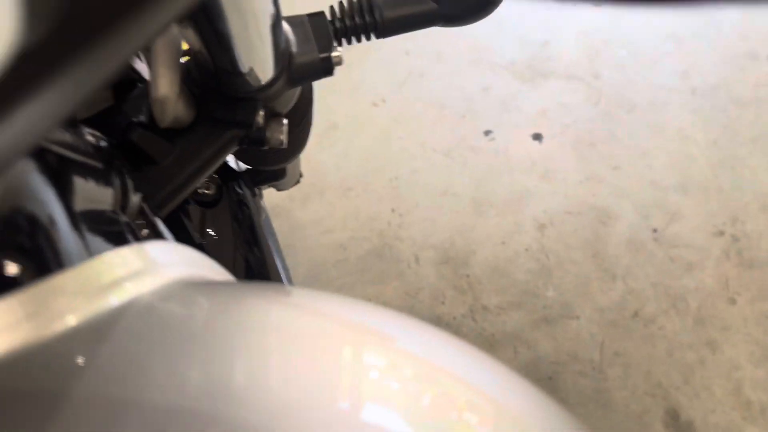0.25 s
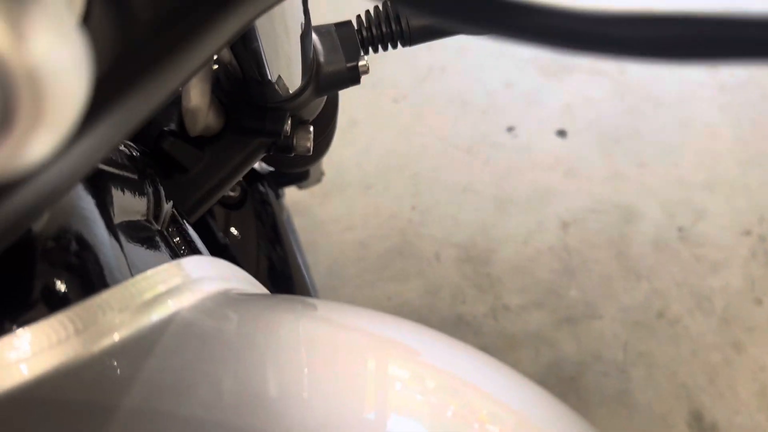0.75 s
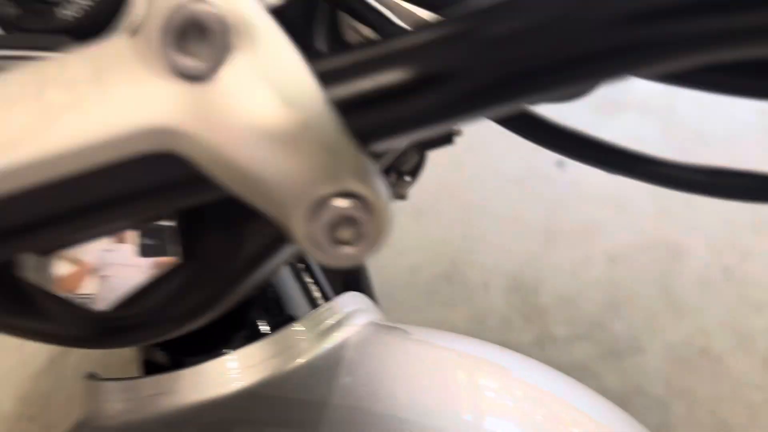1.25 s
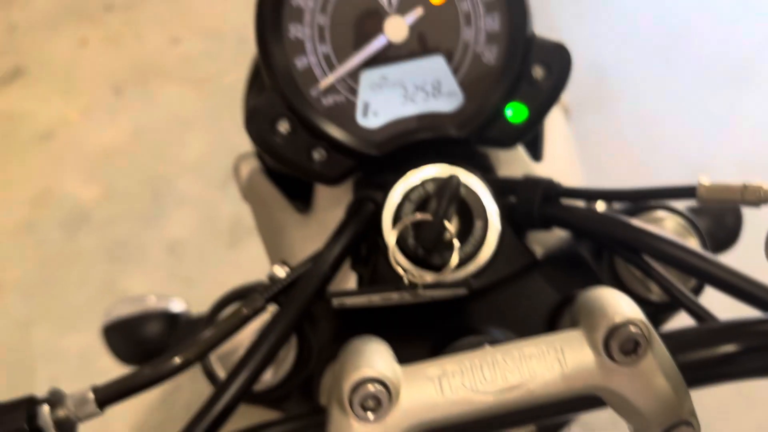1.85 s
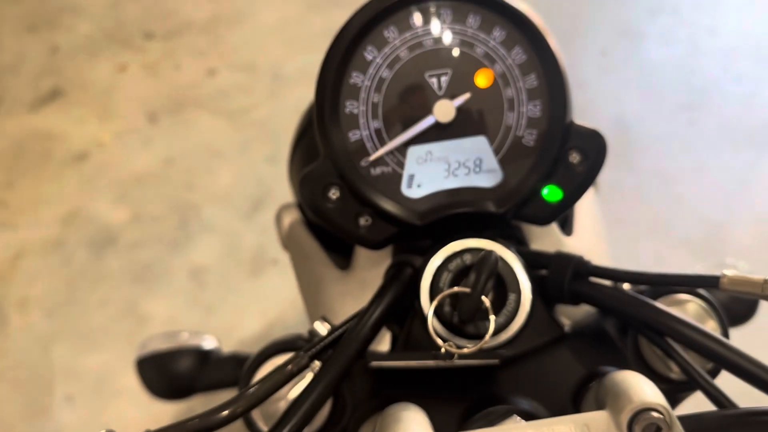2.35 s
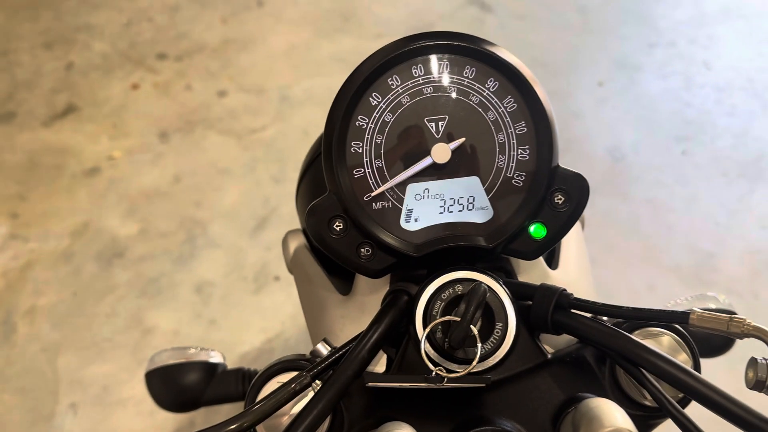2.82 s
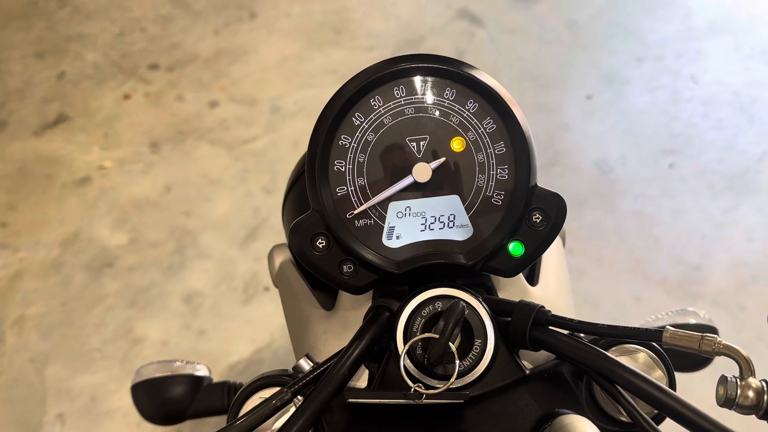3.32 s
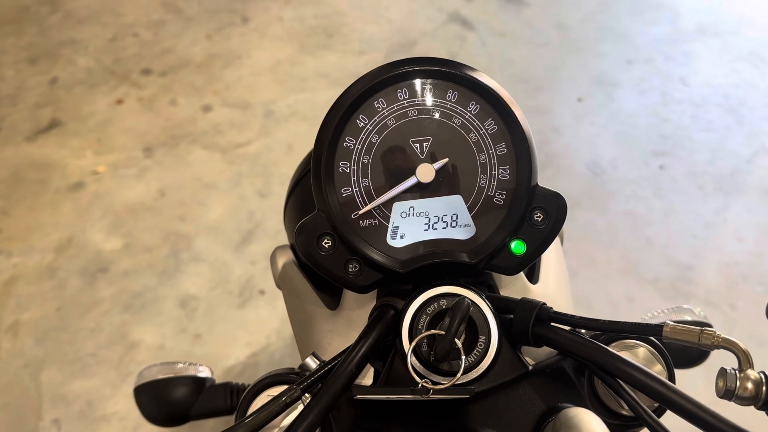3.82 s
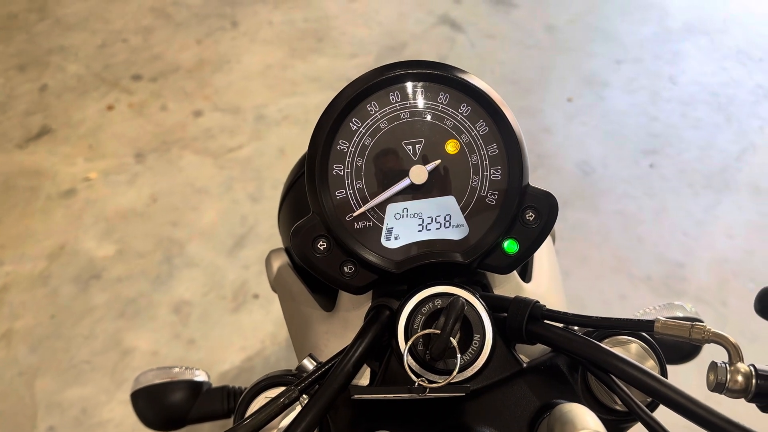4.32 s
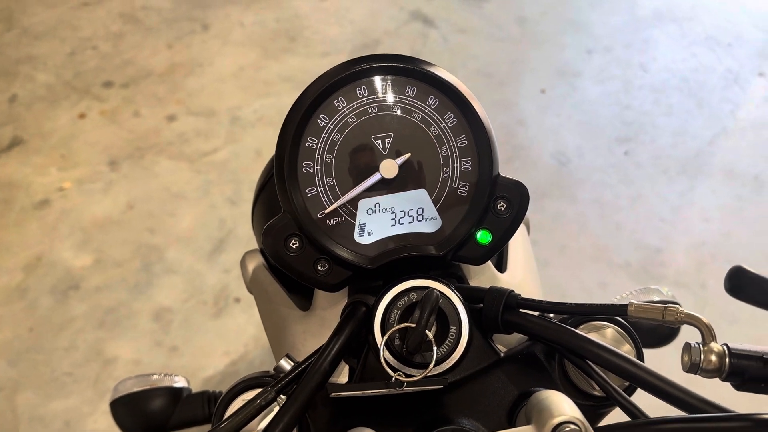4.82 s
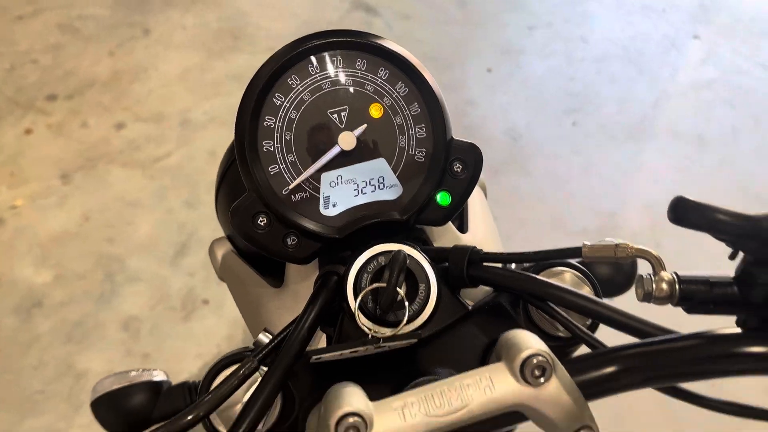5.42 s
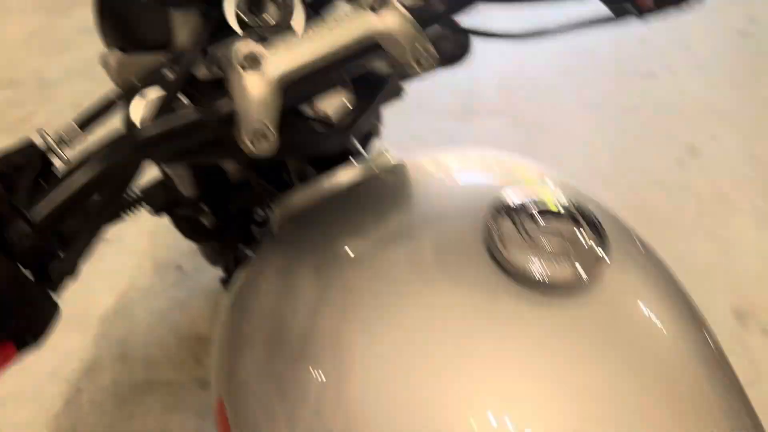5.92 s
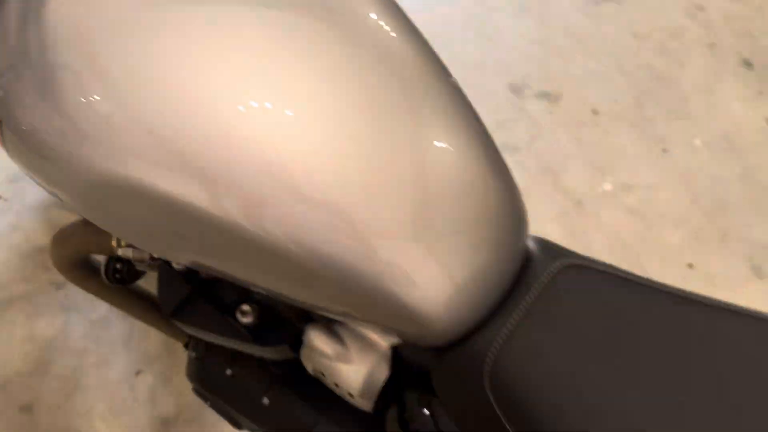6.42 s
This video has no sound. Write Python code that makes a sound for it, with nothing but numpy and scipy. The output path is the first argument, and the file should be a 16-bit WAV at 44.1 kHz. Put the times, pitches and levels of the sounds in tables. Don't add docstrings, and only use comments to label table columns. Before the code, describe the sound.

Close handheld stereo pickup of a motorcycle starting indoors. A harsh, jerky starter grind whines downward in short strokes with metallic knocks, then lets go as the two cylinders fire raggedly. The engine quickly finds a lumpy, bassy idle, its muffled exhaust pulsing unevenly beneath dense mechanical ticking and gear whine. The idle wanders slightly without revving; near the end the treble clatter comes a little closer. Hard surfaces add a diffuse tail.

```python
import sys
import numpy as np
from scipy import signal
from scipy.fft import rfft, irfft, next_fast_len
from scipy.io import wavfile
from scipy.ndimage import uniform_filter1d

SR = 44100
rng = np.random.default_rng(int(sys.argv[2]) if len(sys.argv) > 2 else 0)


def gain_from_db(level_db):
    decades = np.asarray(level_db, float) / 20
    return 10 ** decades


def master(y):
    cut = np.clip(np.atleast_2d(y).T, -1, 1)
    pcm = np.round(cut * 32767)
    wavfile.write(sys.argv[1], SR, pcm.astype(np.int16))


N = 293706

# (peak time [s], rise time [s], grind level [dB], whine level [dB], tooth whine frequency [Hz])
STROKES = [
    (.05, 0.22, -11, -48, 1180),
    (0.151, 0.018, -17, -14, 1220),
    (.184, 0.016, -13.5, -18, 1280),
    (0.322, 0.042, -11, -38, 1120),
    (0.439, 0.015, -12, -21, 1140),
    (0.647, .035, -15.5, -25, 1080),
]


def evened(x):
    return x / np.sqrt(np.mean(x ** 2) + 1e-20)


def read(points, hz):
    f, value = np.transpose(points)
    return np.interp(np.log(hz + 1), np.log(f + 1), value)


def played(rows):
    s, *columns = np.transpose(rows)
    t = np.arange(N) / SR
    lasting = 1. * (t >= s[0] - .01) * (t <= s[-1])
    return [np.interp(t, s, c) for c in columns] + [uniform_filter1d(lasting, 800)]


def coloured(x, gain):
    size = next_fast_len(N + 4096)
    hz = np.fft.rfftfreq(size, 1 / SR)
    return irfft(rfft(x, size) * gain(hz), size)[..., :N]


def resonate(x, hz, width_hz):
    turn = np.exp(2j * np.pi * np.cumsum(hz * np.ones(N)) / SR)
    r = np.exp(-np.pi * width_hz / SR)
    return 2 * (turn * signal.lfilter([1 - r], [1, -r], x / turn + 1e-18)).real


def struck(hits, modes, rise_s=0.0019, rattle_s=0.):
    t, blows = np.arange(SR // 2) / SR, np.zeros(N)
    for s, db in hits:
        later = np.r_[0, rng.random(5)] * rattle_s
        bounce_db = db - 7 * (later > 0) - 300 * later
        np.add.at(blows, np.round((s + later) * SR).astype(int), gain_from_db(bounce_db))
    ring = sum(gain_from_db(db - 60 * t / t60) * np.sin(2 * np.pi * hz * t) for hz, db, t60 in modes)
    return signal.fftconvolve(blows, ring * (1 - np.exp(-t / rise_s)))[:N]


def room_hum():
    # (frequency [Hz], density [dB per Hz])
    hum_density = [(15, -75), (30, -62), (60, -56), (150, -60), (400, -66), (2000, -80), (15000, -95)]
    return coloured(rng.standard_normal(N), lambda hz: gain_from_db(read(hum_density, hz) + 34.5))


def showroom(x):
    # (frequency [Hz], level [dB])
    wet_level = [(40, -34), (150, -21), (300, -9), (600, -3), (1300, -2), (2500, -4), (5000, -5),
                 (7500, -15), (9000, -15), (15000, -8)]
    t = np.arange(SR // 2) / SR
    low, high = rng.standard_normal((2, 2, len(t)))
    tail = uniform_filter1d(low, 8) * gain_from_db(-60 * t / 0.99 + 6.0) + high * gain_from_db(-60 * t / 0.66)
    tail *= t > .004
    even = lambda hz: gain_from_db(read(wet_level, hz)) / np.sqrt(1 + 7.0 / (1 + (hz / 2500) ** 2))
    return coloured(signal.fftconvolve(x[None], tail / 30, axes=1)[:, :N], even)


def strokes(levels_db, quick_db, fall_db_per_s):
    rise_db, quick_s, let_go_s, let_go_db_per_s = 13, .01, .68, 100
    t = np.arange(SR) / SR
    s, rise_s = np.transpose(STROKES)[:2, :, None]
    after = np.maximum(t - s, 0)
    shape_db = -rise_db * np.maximum(s - t, 0) / rise_s - quick_db * (1 - np.exp(-after / quick_s))
    db = np.array(levels_db)[:, None] + shape_db - fall_db_per_s * after
    db = 10 * np.log10((gain_from_db(db) ** 2).sum(0) + 1e-30)
    db -= let_go_db_per_s * np.maximum(t - let_go_s, 0)
    return np.r_[db, np.full(N - SR, -200.)]


def starter_grind():
    # (frequency [Hz], density [dB per Hz])
    grind_density = [(150, -57), (250, -20), (385, -39), (450, -14), (507, -36), (583, -14), (913, -16),
                     (1120, -3.5), (2160, -12.5), (2620, -11.5), (3890, -22.5), (6100, -20.5), (7700, -11),
                     (8600, -14.5), (10000, -24.5), (15500, -40)]
    # (time [s], level [dB])
    hisses = [
        (0, -32),
        (.132, -21.5),
        (.27, -20.5),
        (.428, -32),
        (.615, -26),
    ]
    hiss_fall_db_per_s = 57
    t = np.arange(N) / SR
    grind_db = strokes(np.transpose(STROKES)[2], quick_db=7, fall_db_per_s=70)
    hiss = sum(gain_from_db(db - hiss_fall_db_per_s * abs(t - s)) * np.clip((t - s) / .006, 0, 1)
               for s, db in hisses)
    grit = rng.standard_normal(N) * gain_from_db(1.6 * evened(uniform_filter1d(rng.standard_normal(N), 90)))
    band = lambda f: 1 / (1 + (330 / (f + 1)) ** 6) / (1 + (f / 11500) ** 6)
    grind = evened(coloured(grit, lambda f: gain_from_db(read(grind_density, f)) * band(f)))
    treble = coloured(grind, lambda f: 1 / (1 + (3800 / (f + 1)) ** 8))
    spin_up = np.interp(t, [.1, .13], [.4, 1])
    return gain_from_db(grind_db - 3.0) * spin_up * (grind - treble) + hiss * treble


def starter_whine(teeth):
    s, _, _, whine_db, hz = np.transpose(STROKES)
    whine_db = strokes(whine_db, quick_db=6, fall_db_per_s=230)
    hz = np.interp(np.arange(N) / SR, s, hz)
    whine = evened(resonate(teeth, hz, 50) + gain_from_db(-4) * resonate(teeth, 1570, 60))
    return gain_from_db(whine_db) * whine


def solenoid(teeth):
    # (frequency [Hz], width [Hz], level [dB])
    housing = [(721, 40, 3), (1020, 70, -9), (1190, 60, -6), (1440, 60, -4), (1990, 70, -8), (2280, 40, -5),
               (2870, 80, -13)]
    top_s, spread_s, off_s = .045, .06, .13
    t = np.arange(N) / SR
    buzz = gain_from_db(-26) * np.exp(-((t - top_s) / spread_s) ** 2) + gain_from_db(-42)
    ring = sum(gain_from_db(db) * evened(resonate(teeth, f, w)) for f, w, db in housing)
    return buzz * np.clip((off_s - t) / 0.022, 0, 1) * ring


def clanks():
    # (time [s], level [dB], ringing part [index])
    knocks = [(.139, -19, 0), (.170, -17, 0), (.225, -25, 0), (.277, -15, 1), (.325, -22, 1),
              (.430, -23, 1), (.462, -27, 2), (.617, -18, 2), (.64, -22, 2), (1.002, -30, 0)]
    # (frequency [Hz], level [dB], t60 [s])
    parts = [
        [(2545, 1, .2), (2585, -4, .2), (5130, -2, .2), (5190, -6, .2), (6390, -2, .25), (6345, -5, .3),
         (7580, -10, .25)],
        [(5884, 0, .15), (5905, -9, .45), (5870, -11, .45), (4300, -6, .15), (7090, -11, .3), (8030, -11, .3),
         (9800, -14, .15)],
        [(6380, 0, .2), (6350, -6, .45), (7080, -9, .4), (2545, -4, .25), (6840, -9, .3), (4310, -10, .12),
         (9400, -9, .15)],
    ]
    out = np.zeros(N)
    for k, modes in enumerate(parts):
        loose = 1 + .5 * evened(resonate(rng.standard_normal(N), 0, 90))
        hits = [(s, db) for s, db, part in knocks if part == k]
        out += gain_from_db(-8.5) * loose * struck(hits, modes, rise_s=0.0013, rattle_s=.03)
    return out


def freewheel():
    # (time [s], frequency [Hz], level [dB])
    whistle = [(.72, 13900, -64), (.8, 14400, -51), (.9, 15000, -52), (1.0, 15300, -50), (1.08, 15750, -63)]
    hz, db, gate = played(whistle)
    return gate * gain_from_db(db) * np.sin(2 * np.pi * np.cumsum(hz) / SR)


def sags():
    # (time [s], length [s], start frequency [Hz], end frequency [Hz], level [dB])
    drags = [
        (.135, .03, 1400, 1200, -23),
        (.282, .05, 1550, 950, -14),
        (.423, .03, 1520, 960, -13),
        (.61, .052, 1650, 980, -16),
    ]
    out = np.zeros(N)
    for s, length_s, from_hz, to_hz, db in drags:
        u = np.arange(0, 1, 1 / (length_s * SR))
        turns = np.cumsum(from_hz + (to_hz - from_hz) * u) / SR
        upper = np.cumsum(2350 + 1.2 * (from_hz - to_hz) * (1 - u)) / SR
        whine = np.sin(2 * np.pi * turns) + gain_from_db(-10) * np.sin(2 * np.pi * upper)
        rough = 1 + .3 * evened(uniform_filter1d(rng.standard_normal(len(u)), 60))
        out[round(s * SR):][:len(u)] += gain_from_db(db + 4) * whine * rough * np.sin(np.pi * u ** 1.7)
    return out


def cranking_puffs():
    # (time [s], level [dB])
    puffs = [(.175, -33.5), (.222, -35), (.297, -44), (.414, -33), (.462, -35), (.531, -28.5), (.575, -31),
             (.655, -36)]
    # (frequency [Hz], level [dB], t60 [s])
    pipe = [(57.5, -1, 0.82), (80.8, 1, 0.58), (87, -2, 0.38), (138, -2.5, 0.12)]
    return gain_from_db(-9.0) * struck(puffs, pipe)


def starter():
    teeth = rng.standard_normal(N)
    gear = starter_grind() + starter_whine(teeth) + sags()
    return gear + solenoid(teeth) + clanks() + freewheel() + cranking_puffs()


def crank():
    # (time [s], speed [engine cycles per s], firing strength [dB])
    idle = [(1.1, 12.227, -0.7), (1.4, 12.009, -0.6), (2.0, 12.836, 0.0), (2.3, 12.931, 1.7),
            (2.65, 12.512, -0.5), (2.9, 12.735, 0.2), (3.2, 12.583, -0.2), (3.7, 13.06, 1.0),
            (3.85, 12.843, 0.9), (4.25, 12.797, 0.4), (4.5, 12.801, 0.5), (4.75, 13.141, -0.1),
            (5.15, 13.153, 0.7), (5.5, 12.656, 0.2), (5.65, 12.721, -0.4), (6.2, 12.168, -1.8),
            (6.3, 12.343, -1.5), (6.7, 12.349, -1.1)]
    cycles_at_idle = .527
    speed, strength_db, _ = played(idle)
    turned = np.cumsum(speed) / SR
    return turned - turned[round(idle[0][0] * SR)] + cycles_at_idle, strength_db


def crank_angle():
    even = crank()[0]
    surges = [(1, .003), (2, -.0012), (3, .0011)]
    return even + sum(size * np.sin(2 * np.pi * k * even + k) for k, size in surges)


def clatter(angle):
    # (frequency [Hz], density [dB per Hz])
    noise_density = [(120, -78), (240, -50), (340, -54), (500, -58.5), (900, -56.5), (1200, -48),
                     (1600, -56), (2600, -61), (3200, -65.5), (3900, -56), (4700, -76), (6300, -63.5),
                     (8400, -63.5), (10000, -68.5), (12500, -87.5), (15500, -88)]
    # (frequency [Hz], width [Hz], level [dB])
    covers = [(6040, 16, -81), (6800, 57, -98), (4930, 270, -51), (12200, 50, -69), (2716, 160, -55),
              (750, 50, -60), (1825, 70, -59.5)]
    runs_from_s, nearer_from_s, nearer_db_per_s = 0.595, 5.2, 2.
    t = np.arange(N) / SR - runs_from_s
    gate = np.clip(t / .03, 0, 1)
    low_db = -41 + 8.5 * np.exp(-abs(t) / 1)
    high_db = -46 + 10 * np.exp(-abs(t) / 0.74)
    high_db += nearer_db_per_s * np.maximum(np.arange(N) / SR - nearer_from_s, 0)
    beat = sum(np.exp(-((angle - at) % 1) / 0.15) for at in (.1, .33, .47, .72, .88))
    ticks = gain_from_db(2.4 * np.minimum(rng.exponential(1, N), 5))
    ticks *= (rng.random(N) < 1500 / SR) * rng.choice([-1, 1], N)
    drive = evened(rng.standard_normal(N) * (1 + 0.35 * beat) + 0.42 * evened(ticks))
    tone = coloured(drive, lambda hz: gain_from_db(read(noise_density, hz) + 29.5))
    tone += sum(gain_from_db(db) * evened(resonate(drive, hz, width)) for hz, width, db in covers)
    high = coloured(tone, lambda hz: 1 / (1 + (4300 / (hz + 1)) ** 8))
    dry_cover = gain_from_db(-35.5 - 20 * abs(t)) * evened(resonate(drive, 1968, 30))
    return gate * (dry_cover + gain_from_db(low_db + 39.0) * (tone - high) + gain_from_db(high_db + 41.5) * high)


def gears(angle):
    # (teeth [per engine cycle], level [dB], roughness width [Hz])
    meshes = [
        (100.14, -37, 64),
        (303.5, -44.5, 193),
        (506, -55, 200),
    ]
    # (frequency [Hz], width [Hz], level [dB])
    casings = [(1256, 28, 10), (1355, 20, 5), (4027, 30, 5), (3760, 50, 3), (3640, 40, -6), (3930, 40, 2)]
    from_s, whine_db, fade_db_per_s = .87, 1.5, 1
    t = np.arange(N) / SR - from_s
    mesh = np.zeros(N)
    for teeth, db, width in meshes:
        rough = evened(resonate(rng.standard_normal(N), 0, width))
        mesh += gain_from_db(db) * (1 + .38 * rough) * np.sin(2 * np.pi * teeth * angle)
    mesh *= 1 + .5 * np.sin(2 * np.pi * 4 * angle)
    mesh = mesh + sum(gain_from_db(db) * resonate(mesh, hz, width) for hz, width, db in casings)
    return gain_from_db(whine_db - fade_db_per_s * t) * np.clip(t / 0.025, 0, 1) * mesh


def exhaust():
    # (frequency [Hz], width [Hz], coupling to cylinder 0, to cylinder 1)
    exhaust_modes = [(36.1, 4.9, 0.02, 0.03), (64.4, 6.8, 0.08, 0.08), (77.2, 4.0, 0.03, -0.04),
                     (81.0, 4.0, 0.0, 0.07), (94.2, 9.1, -0.22, -0.17), (110.1, 4.4, 0.03, -0.11),
                     (121.9, 4.0, -0.16, -0.16), (133.3, 4.0, 0.12, 0.16), (144.0, 16.1, 0.01, 0.12),
                     (151.3, 4.0, -0.05, -0.08), (162.5, 5.8, -0.11, -0.0), (179.0, 10.0, -0.15, -1.87),
                     (179.4, 8.7, 0.21, 1.64), (193.4, 4.0, 0.06, 0.07), (208.9, 40.0, 0.04, 0.16),
                     (237.0, 14.8, -0.01, -0.03), (262.0, 40.0, -0.02, -0.01),
                     (230, 12, .03, .03), (300, 25, .04, .03), (342, 16, .06, .05)]
    # (time [s], strength [dB], cylinder [index])
    catch = [(.6992, -2.4, 0), (.7095, 2.0, 1), (.7429, .6, 0), (.7452, -6.7, 1), (.7984, -2.4, 0),
             (.8111, .7, 1), (.8437, 2.0, 0), (.8968, -.5, 0), (.9278, 1.4, 1), (.9341, -3.7, 0),
             (.977, -1.8, 0), (1.0071, .5, 1), (1.0579, -.2, 0), (1.0881, .6, 1)]
    # (frequency [Hz], level [dB], t60 [s])
    cold_pipe = [(48, 6, 0.14), (217, 10, 0.072), (267, -3, 0.024), (336, -1.5, 0.083), (410, -11, .04)]
    second_fires, bark_fade_db_per_s = .375, 13
    (cycles, strength_db), s = crank(), np.arange(N) / SR
    t, modes, out = np.arange(SR) / SR, np.array(exhaust_modes), np.zeros(N)
    for cylinder in range(2):
        offset = second_fires * cylinder
        at = np.interp(np.arange(1, cycles[-1] - offset) + offset, cycles, s)
        size_db = np.interp(at, s, strength_db) + 0.92 * rng.standard_normal(len(at))
        firings = np.zeros(N + SR)
        firings[np.round(at * SR).astype(int)] = gain_from_db(size_db)
        for start, db, which in catch:
            firings[round(start * SR)] += gain_from_db(db) * (which == cylinder)
        ring = sum(m[2 + cylinder] * np.exp(-np.pi * m[1] * t) * np.sin(2 * np.pi * m[0] * t)
                   for m in modes)
        out += signal.fftconvolve(firings, ring)[:N]
    out = signal.sosfilt(signal.butter(2, 30, "high", fs=SR, output="sos"), out)
    muffled = signal.sosfilt(signal.butter(4, 240, fs=SR, output="sos"), out)
    barks = [(start, db - bark_fade_db_per_s * (start - catch[0][0])) for start, db, _ in catch]
    return gain_from_db(-22.5) * struck(barks, cold_pipe, rattle_s=0.00953) + gain_from_db(.4) * muffled


def scene():
    # (frequency [Hz], lead [rad])
    lead = [(0, 0), (1290, 0), (1810, -.3), (2500, .7), (3880, .8), (5860, .3), (7000, 1.5), (7750, 2.5),
            (8440, 3.15), (8870, 2.6), (9300, 1.3), (10400, .2), (14300, -.1), (15200, -1.5)]
    # (frequency [Hz], left over right [dB])
    louder_left = [(30, -1), (70, 3.5), (300, 1.5), (700, 3.5), (1290, -3), (2400, 2), (4400, 6.5),
                   (8000, 4), (15000, -8.5)]
    # (frequency [Hz], lead [rad])
    starter_lead = [(600, 0), (1050, -1.2), (1400, -2.5), (2300, 0)]
    angle = crank_angle()
    bike = room_hum() + clatter(angle) + gears(angle) + exhaust()
    motor = starter()
    side = np.array([[.5], [-.5]])
    balance = lambda hz: gain_from_db(side * read(louder_left, hz))
    ahead = lambda hz: np.exp(1j * side * read(lead, hz))
    aside = lambda hz: np.exp(1j * side * read(starter_lead, hz))
    direct = coloured(bike[None], lambda hz: balance(hz) * ahead(hz))
    direct += coloured(motor[None], lambda hz: balance(hz) * ahead(hz) * aside(hz))
    return direct + showroom(bike + gain_from_db(-7) * motor)


def low_pass(x):
    return signal.sosfilt(signal.butter(12, 15680, fs=SR, output="sos"), x)


def record(dry):
    dry = coloured(dry, lambda hz: 1 / (1 + (29 / (hz + 1)) ** 8))
    return low_pass(np.tanh(dry / 1.705) * 1.615)


dry = scene()
out = record(dry)
master(out)
```